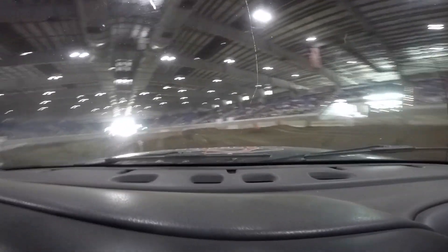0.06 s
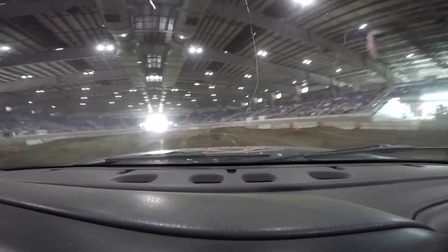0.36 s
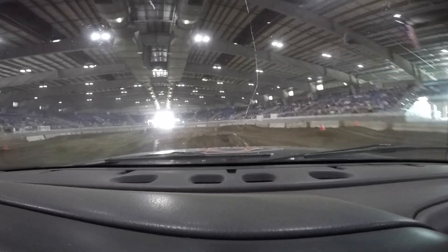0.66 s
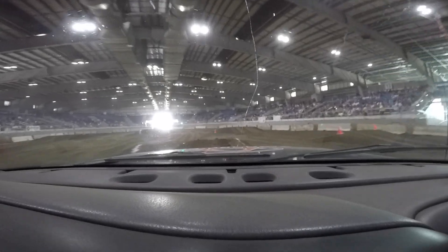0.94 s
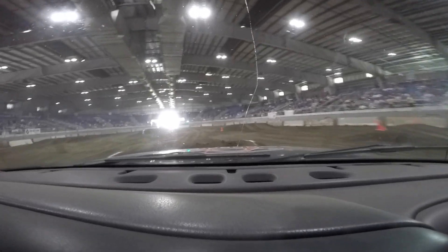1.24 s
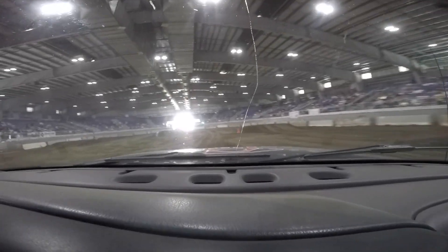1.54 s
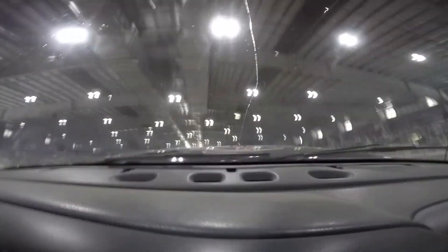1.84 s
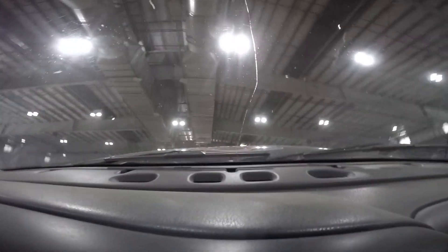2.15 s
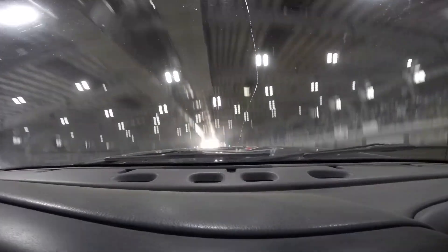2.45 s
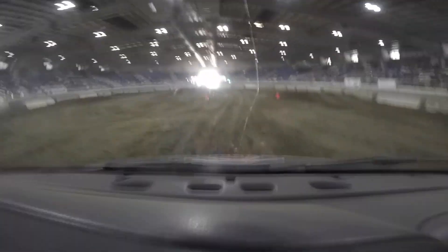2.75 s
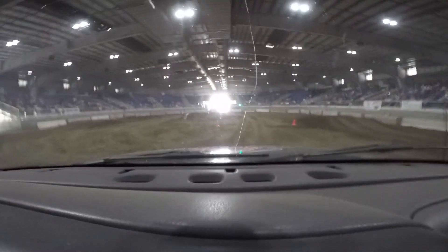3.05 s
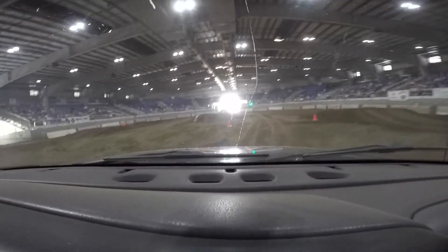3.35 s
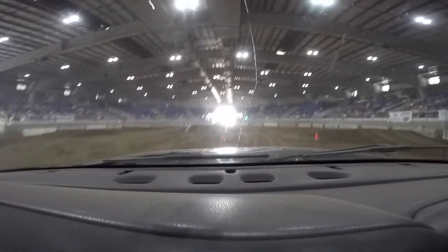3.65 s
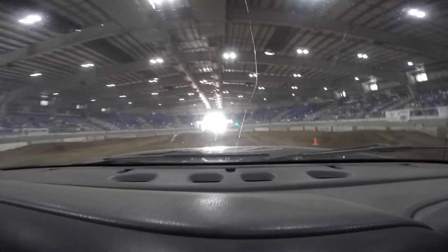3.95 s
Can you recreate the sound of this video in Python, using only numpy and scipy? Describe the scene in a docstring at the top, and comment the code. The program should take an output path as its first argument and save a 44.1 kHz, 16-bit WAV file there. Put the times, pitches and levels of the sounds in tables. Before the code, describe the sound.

A truck engine revs and eases off over a rumbling chassis, heard inside the cab on an indoor dirt track. The truck slams into a ramp, lands hard with clattering fittings and spraying dirt, then accelerates again.

```python
"""A truck engine revs, heard from the cab on an indoor dirt track: pulsing exhaust, intake growl, tyre hiss.
It eases off, the truck slams into a ramp, flies for a second and lands hard, and the engine picks up.
Panels boom, the frame crunches, loose cab fittings clack and dirt sprays against the underside.
The chassis rumbles on its springs throughout, and rubbing trim gives a few faint squeaks."""
import sys
import numpy as np
from scipy import signal
from scipy.fft import rfft, irfft, next_fast_len
from scipy.io import wavfile
from scipy.ndimage import uniform_filter1d, minimum_filter1d, map_coordinates

SR = 44100
rng = np.random.default_rng(int(sys.argv[2]) if len(sys.argv) > 2 else 0)


def generate_wav(sig):
    """Save sig (samples, or channels by samples) to the path in sys.argv[1] as 16-bit PCM at SR."""
    pcm = np.round(np.clip(np.atleast_2d(sig).T, -1, 1) * 32767).astype(np.int16)
    wavfile.write(sys.argv[1], SR, pcm)


N = 176400

# engine revs (time [s], firing rate [Hz])
REVS = [(0, 126.8), (.16, 153), (.3, 147.4), (.42, 122.5), (.57, 100.9), (.93, 106.8), (1.6, 103.9),
        (2.6, 107.8), (3.53, 88.1), (3.68, 112.7), (3.85, 134.4), (4, 147)]
# engine effort (time [s], exhaust level [dB], load [0-1])
ENGINE_EFFORT = [(0, -20, 0.8), (.3, -20.5, 0.5), (.55, -12, 0.1), (1.0, -12.5, 0), (1.62, -15, 0.27),
                 (1.9, -29.5, 0), (2.35, -25, 0), (2.52, -16.5, 0), (2.7, -16.5, 0.14), (3.0, -29, 1),
                 (3.35, -40, 0.3), (3.58, -18, 0.97), (3.85, -18.5, 0.91), (4, -19, 0.5)]
# exhaust partials (multiple of the cycle rate, coasting level [dB], loaded level [dB])
EXHAUST_PARTIALS = [(3, -11.5, -17.5), (4, -18.5, -1), (5, -3.5, 0.5), (6, -29.5, -7.5), (8, -18.5, -3.5),
                    (12, -33.5, -27)]
# noise bed in the cab (time [s], engine roar [dB], tyre and fan hiss [dB])
BED_LEVELS = [(0, -29, -47.5), (.35, -29, -45), (.65, -34.5, -48), (.95, -32.5, -49), (1.6, -35, -49.5),
              (1.95, -32.5, -44.5), (2.35, -41.5, -53), (2.65, -37, -52.5), (3.05, -36, -46.5),
              (3.32, -45, -54.5), (3.6, -35.5, -48.5), (4, -32, -46.5)]
# resonances of the cab air and the intake (frequency [Hz], width [Hz], level [dB])
CAB_MODES = [(365.8, 10.7, 4), (442, 21, -6), (752, 30, -18.5)]
INTAKE_MODES = [(372, 12, -6), (455.5, 12, 2), (511, 12, 4), (677, 52, -14.5), (828, 15, -11.5),
                (949, 30, -4.5), (2680, 160, -7.5)]
# chassis shake (time [s], level [dB])
SHAKE_LEVELS = [(0, -13), (.45, -18.5), (1.55, -16.5), (1.7, -10), (1.85, -17.5), (2.2, -15.5), (2.45, -19),
                (2.68, -13.5), (2.8, -14), (2.93, -12), (3.05, -24.5), (3.32, -28), (3.42, -23),
                (3.56, -12), (3.8, -24.5), (4, -14)]
# trim squeaks (time [s], level [dB])
TRIM_SQUEAKS = [(.01, -62), (.135, -70), (.425, -67), (.458, -64), (.965, -66), (1.02, -62), (1.56, -63)]
# panel and suspension booms (time [s], pitch [Hz], level [dB], T60 [s])
PANEL_BOOMS = [(0.441, 384.7, -21.5, 0.19), (1.662, 32.6, -8, 0.18), (1.709, 355.4, -4.5, 0.13),
               (1.72, 153, -12, 0.34), (1.7605, 580, 4.5, 0.014), (2.76, 35.7, -3.5, 0.91),
               (2.779, 133.4, -7.5, 0.2), (2.801, 497, -11, 0.06), (2.828, 296.3, -11, 0.16),
               (2.849, 384, -17, 0.047), (2.864, 760, -13, 0.028)]
# dirt sprays and blows to the frame (time [s], level [dB], rise [s], T60 [s])
DIRT_SPRAYS = [(.786, -32, 0.0043, .18), (1.169, -37.5, .003, 0.25), (1.272, -47, 0.0039, 0.22),
               (1.70, -31.5, 0.032, 0.48), (2.14, -43.5, 0.02, 0.77), (2.525, -41.5, 0.012, 0.14),
               (2.664, -35, 0.0077, 0.11), (2.69, -37.5, 0.012, 1), (2.796, -26, .008, 0.59),
               (2.857, -19.5, .012, 0.27), (3.06, -39, .02, 0.13)]
FRAME_BLOWS = [(1.665, -16.5, 0.018, 0.68), (2.737, -21.5, 0.028, 0.53), (2.785, -13, 0.056, 0.4),
               (3.52, -28.5, 0.0023, 0.22)]
# loose fittings knocking (time [s], level [dB], treble [dB])
FITTING_HITS = [(0.789, -19.5, -28), (1.666, -15, -26.5), (1.6765, 2.5, -16.5), (1.69, -10, -22),
                (1.703, -15, 10.5), (1.7595, -10.5, -8), (1.821, -13, 0), (1.899, -24, 0.5),
                (2.761, -38, -13), (2.797, -5, -17.5), (2.8035, -10.5, -23), (2.811, -9.5, -18.5),
                (2.819, -7.5, -21.5), (2.848, -13.5, -16.5), (2.864, -10.5, -18.5), (2.891, -15, -17),
                (2.937, -9, -4), (2.988, -16.5, 5.5), (3.528, -16, -14), (3.531, -15.5, -18),
                (3.695, -19, -8), (3.706, -24, -9.5), (3.775, -13.5, -1.5)]
# ring of a fitting (frequency [Hz], level [dB])
FITTING_MODES = [(810, 1.5), (1110, 5), (1290, -0.5), (1870, 7), (2390, 4), (3120, 0.5), (3700, -8),
                 (4370, -3), (5270, -7.5), (6150, -9)]
# sharp ticks: metal on metal, and pebbles striking during the flight (time [s], level [dB])
SHARP_TICKS = [(1.6767, -19.5), (1.760, -20), (1.821, -29), (1.969, -38), (2.047, -38), (2.8276, -15),
               (3.695, -33)]
# small steel parts clinking (time [s], pitch [Hz], level [dB])
STEEL_CLINKS = [(1.7595, 6120, -10), (1.788, 1380, -12), (2.7992, 2520, -6), (2.893, 3170, -7),
                (2.893, 6044, -21.5), (2.935, 6000, -9)]
# tone colour of each noise layer (frequency [Hz], relative level [dB])
ROAR_EQ = [(60, -39), (130, -11), (200, -2), (370, -1), (500, -5), (620, -16), (950, -17.5), (1400, -40),
           (3000, -65)]
HISS_EQ = [(400, -13.5), (1000, 3.5), (1550, 0.5), (2800, 3), (3400, 0), (4100, -2.5), (6000, -11),
           (7200, -18.5), (10000, -30.5), (14500, -34.5)]
SHAKE_EQ = [(10, -12), (24, 4.5), (40, 3), (60, 0), (85, -13), (140, -13), (220, -24.5), (500, -78.5)]
DIRT_EQ = [(300, 11.5), (1000, 1), (4000, 4.5), (5800, -1), (7200, -11), (10000, -17.5), (14500, -19.5)]
CRACK_EQ = [(200, -14.5), (700, 7), (2400, 3.5), (6200, -6), (7200, -18), (15000, -38)]
CRUNCH_EQ = [(60, -30), (150, -6.5), (320, 6), (520, -2), (850, -9.5), (1300, -18), (2400, -21),
             (6000, -50)]
TICK_EQ = [(2000, -17), (3600, 7), (6600, -5.5), (7600, 0.5), (8600, -8.5), (14500, -13)]

CYLINDERS = 8
CONTACT_RISE_S = .0004
TIME = np.arange(N) / SR
HIT_TIME = TIME[:SR // 10]


def amp(db):
    """Decibels to gain."""
    return 10 ** (np.asarray(db) / 20)


def unit(x):
    """Scale to rms 1."""
    return x / np.sqrt(np.mean(x ** 2) + 1e-20)


def curves(rows):
    """One automation curve for each column after the time."""
    times, *columns = np.transpose(rows)
    return [np.interp(TIME, times, column) for column in columns]


def wobble(rate):
    """A smooth random curve, rate knots a second."""
    return map_coordinates(rng.standard_normal(4000), [TIME * rate], mode="wrap")


def filtered(x, response):
    """Filter x by a gain given as a function of frequency."""
    size = next_fast_len(N + SR // 2)
    return irfft(rfft(x, size) * response(np.fft.rfftfreq(size, 1 / SR)), size)[:N]


def coloured(x, eq):
    """x through an EQ curve, at rms 1."""
    hz, db = np.transpose(eq)
    return unit(filtered(x, lambda f: amp(np.interp(np.log(f + 1), np.log(hz), db))))


def noise(eq):
    """Noise in the colour of an EQ curve."""
    return coloured(rng.standard_normal(N), eq)


def resonances(x, modes, muffle_hz=3300):
    """x muffled by the cab lining and rung through resonances, at rms 1."""
    def peaks(f):
        return sum((-1) ** k * amp(db) * 1j * f * width / (hz * hz - f * f + 1j * f * width)
                   for k, (hz, width, db) in enumerate(modes))
    muffled = filtered(x, lambda f: 1 / (1 + (f / muffle_hz) ** 2) ** 2)
    return unit(filtered(muffled, peaks))


def add(track, start, sound):
    """Mix a sound into the track at start seconds."""
    part = track[max(round(start * SR), 0):][:len(sound)]
    part += sound[:len(part)]


def snippet(x):
    """A random slice of x, one hit long."""
    return x[rng.integers(N - len(HIT_TIME)):][:len(HIT_TIME)]


def swells(rows):
    """Envelope of bursts that rise and die away, summed in power."""
    power = np.zeros(N)
    for start, db, rise, t60 in rows:
        attack = np.clip((TIME - start) / rise, 0, 1)
        decay = amp(db - 60 * np.maximum(TIME - start - rise, 0) / t60)
        power += (attack * decay) ** 2
    return np.sqrt(power)


def ping(t, hz, t60, rise_s):
    """One struck mode: a dying sine with a softened attack."""
    return amp(-60 * t / t60) * np.sin(2 * np.pi * hz * t) * (1 - np.exp(-t / rise_s))


def partial(firing_phase, order):
    """A harmonic of the engine cycle, in which each cylinder fires once."""
    return np.sqrt(2) * np.sin(order * firing_phase / CYLINDERS + rng.uniform(0, 2 * np.pi))


def exhaust(firing_phase, load, waver_db=2.0):
    """The exhaust note: load shifts the balance of its partials and makes them waver more."""
    note = np.zeros(N)
    for order, coast_db, loaded_db in EXHAUST_PARTIALS:
        db = coast_db + (loaded_db - coast_db) * load
        waver = waver_db * (1 + load) / 2 * wobble(22.04)
        note += amp(db + waver) * partial(firing_phase, order)
    return note


def roar_and_hiss(throb, ring_db=-2, flutter_db=1.1):
    """Engine roar throbs with the firings over ringing cab air; tyre and fan hiss flutters on top."""
    roar_db, hiss_db = curves(BED_LEVELS)
    roar = throb * noise(ROAR_EQ)
    cab_ring = amp(ring_db) * resonances(rng.standard_normal(N), CAB_MODES)
    hiss = unit(np.sqrt(np.abs(throb)) * noise(HISS_EQ)) * amp(flutter_db * wobble(30))
    return amp(roar_db) * unit(roar + cab_ring) + amp(hiss_db) * hiss


def intake_growl(firing_phase, firing_hz, throb, load, db_per_octave=41.5, rasp_gain=.5):
    """Gulps of air ring the intake under throttle, far louder as the revs climb."""
    gulps = sum(partial(firing_phase, order) for order in range(2 * CYLINDERS, 90, 2))
    tone = resonances(gulps, INTAKE_MODES)
    rasp = resonances(throb * rng.standard_normal(N), INTAKE_MODES)
    db = -27 + db_per_octave * np.log2(firing_hz / 148.9)
    return load * amp(db) * unit(tone + rasp_gain * rasp)


def engine(jitter=0.00912, throb_depth=0.27):
    """One slightly unsteady firing rhythm drives the exhaust, the noise bed and the intake."""
    firing_hz, = curves(REVS)
    exhaust_db, load = curves(ENGINE_EFFORT)
    phase = 2 * np.pi * np.cumsum(firing_hz * (1 + jitter * wobble(25))) / SR
    throb = 1 + throb_depth * (np.cos(phase) + np.cos(phase / 2))
    note = amp(exhaust_db) * exhaust(phase, load)
    return note + roar_and_hiss(throb) + intake_growl(phase, firing_hz, throb, load)


def chassis_rumble(evenness=0.65):
    """Deep shudder of the body on its springs, as strong as the ground is rough."""
    shake_db, = curves(SHAKE_LEVELS)
    shudder = noise(SHAKE_EQ)
    power = np.abs(uniform_filter1d(shudder ** 2, size=SR // 10)) + 1e-6
    return amp(shake_db) * unit(shudder / power ** (evenness / 2))  # tame the random surges


def trim_squeaks(hz=10760, width_hz=360, width_s=0.025):
    """Rubbing trim squeaks in brief flickers of thin, high noise."""
    band = unit(filtered(rng.standard_normal(N), lambda f: np.exp(-((f - hz) / width_hz) ** 2)))
    envelope = sum(amp(db) * np.exp(-((TIME - centre) / width_s) ** 2) for centre, db in TRIM_SQUEAKS)
    return band * np.abs(wobble(100)) * envelope


def panel_booms():
    """Bumps, ramp and landing set the panels and suspension ringing."""
    out = np.zeros(N)
    for start, hz, db, t60 in PANEL_BOOMS:
        add(out, start, amp(db) * ping(TIME[:SR // 2], hz, t60, rise_s=0.0014))
    return out


def dirt_sprays(grit_per_s=930, grit_share=0.31, clod_db=2.4, clods_per_s=110):
    """Fine soil and coarser grit hit the underside in clods."""
    grit = unit((rng.random(N) < grit_per_s / SR) * rng.standard_normal(N))
    clods = unit(amp(clod_db * wobble(clods_per_s)))
    soil = rng.standard_normal(N)
    dirt = np.sqrt(grit_share) * grit + np.sqrt(1 - grit_share) * soil
    return swells(DIRT_SPRAYS) * clods * coloured(dirt, DIRT_EQ)


def treble_shelf(hz, treble_db, flat_at_db=-11, corner_hz=3200):
    """Gain that brightens or dulls a clack."""
    return amp((treble_db - flat_at_db) * (1 - 1 / (1 + (hz / corner_hz) ** 4)))


def fitting_clacks(hits, ring_t60=.022, crack_t60=.014, crack_db=-5, trim_db=-0.5):
    """A loose fitting knocks: a crack of contact noise and a short ring, a little different each hit."""
    out, t = np.zeros(N), HIT_TIME
    hz, mode_db = np.transpose(FITTING_MODES)[:, :, None]
    bin_hz = np.fft.rfftfreq(len(t), 1 / SR)
    contact = noise(CRACK_EQ)
    attack = 1 - np.exp(-t / CONTACT_RISE_S)
    for start, db, treble_db in hits:
        gains = amp(mode_db + rng.standard_normal(hz.shape)) * treble_shelf(hz, treble_db)
        modes = gains * np.sin(2 * np.pi * (hz * t + rng.random(hz.shape)))
        ring = modes.sum(axis=0) / np.linalg.norm(gains) * amp(-60 * t / ring_t60)
        spectrum = rfft(snippet(contact)) * treble_shelf(bin_hz, treble_db)
        crack = unit(irfft(spectrum, len(t))) * amp(crack_db - 60 * t / crack_t60)
        add(out, start, amp(db + trim_db) * (ring + crack) * attack)
    return out


def cab_echo(x, t60=.1, wet_db=-21):
    """The close walls of the cab answer with a tight tail."""
    t = TIME[:SR // 3]
    tail = rng.standard_normal(len(t)) * amp(-60 * t / t60)
    return amp(wet_db) * signal.fftconvolve(x, tail / np.linalg.norm(tail))[:N]


def frame_crunches():
    """The frame gives a dull crunch under each blow."""
    return swells(FRAME_BLOWS) * noise(CRUNCH_EQ)


def sharp_ticks(t60=.016):
    """Metal meets metal, and flung pebbles strike, in sharp, bright ticks of noise."""
    out, metal = np.zeros(N), noise(TICK_EQ)
    for start, db in SHARP_TICKS:
        add(out, start, amp(db - 60 * HIT_TIME / t60) * snippet(metal))
    return out


def steel_clinks(t60=0.013):
    """Small steel parts ring briefly, one pitch per clink."""
    out = np.zeros(N)
    for start, hz, db in STEEL_CLINKS:
        add(out, start, amp(db) * ping(HIT_TIME, hz, t60, CONTACT_RISE_S))
    return out


def takeoff_rattle(start=1.839, gap_s=.0145, count=8, db=-32, fade_db_per_s=51, treble_db=8.5):
    """A fitting chatters on after take-off in small, bright, fading clacks."""
    delays = gap_s * (np.arange(count) + .5 * rng.random(count))
    return fitting_clacks([(start + delay, db - fade_db_per_s * delay, treble_db) for delay in delays])


def scene():
    """The mono mix above the dashboard; only the loose parts get the cab echo."""
    truck = engine() + chassis_rumble() + trim_squeaks() + panel_booms() + dirt_sprays() + frame_crunches()
    clatter = fitting_clacks(FITTING_HITS) + sharp_ticks() + steel_clinks() + takeoff_rattle()
    return (truck + clatter + cab_echo(clatter))[None]


def record(dry, ceiling=1, window=41, top_hz=15350):
    """A fast limiter holds down the biggest peaks, then a brick-wall low-pass cuts the very top."""
    needed = np.minimum(1, ceiling / (np.abs(dry[0]) + 1e-9))
    gain = uniform_filter1d(minimum_filter1d(needed, window), window)
    return filtered(dry[0] * gain, lambda hz: hz < top_hz)[None]


dry = scene()
out = record(dry)
generate_wav(out)
```